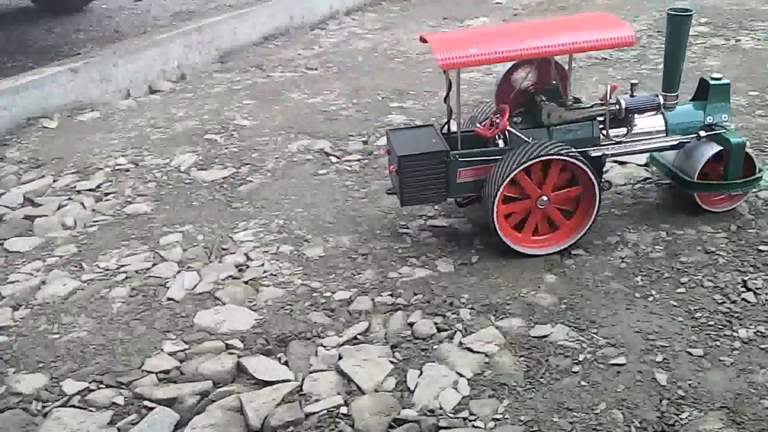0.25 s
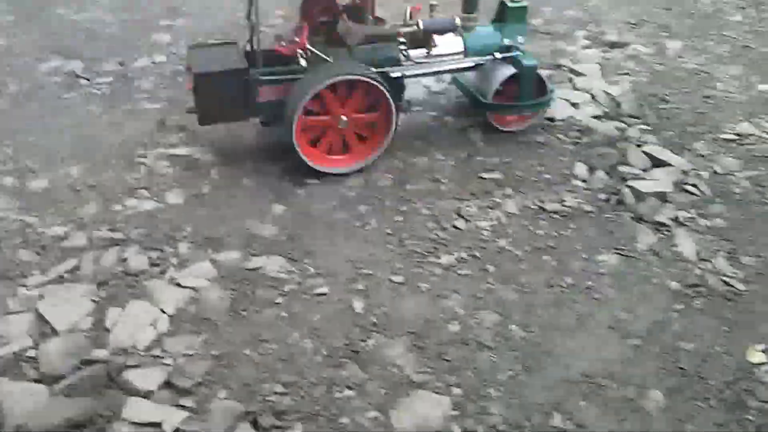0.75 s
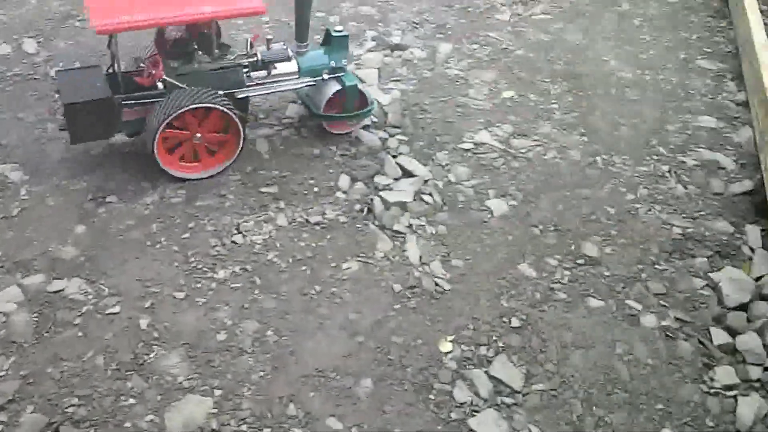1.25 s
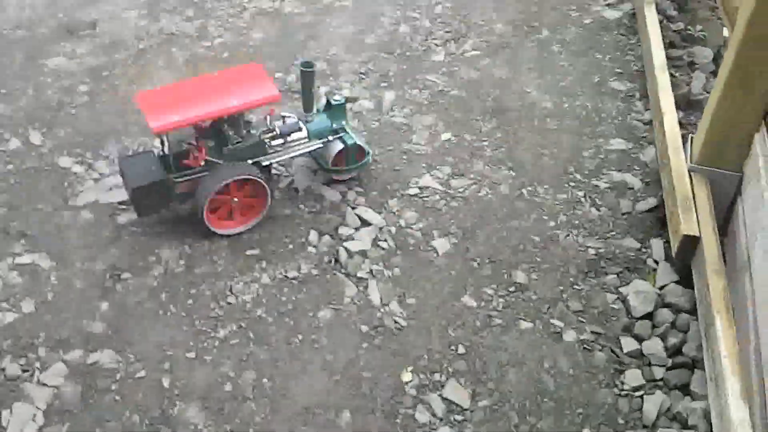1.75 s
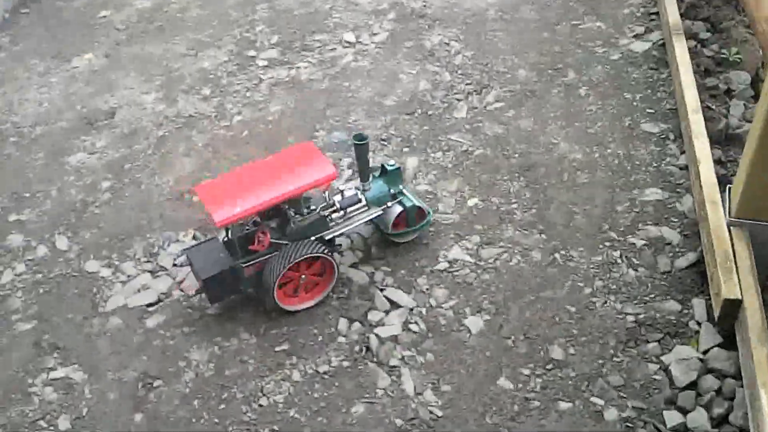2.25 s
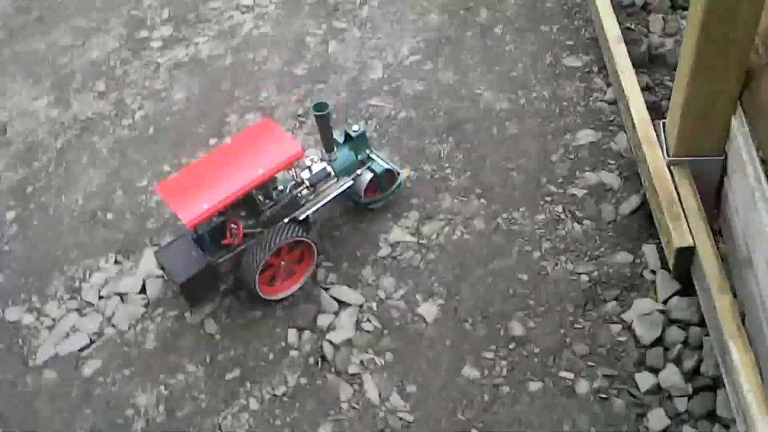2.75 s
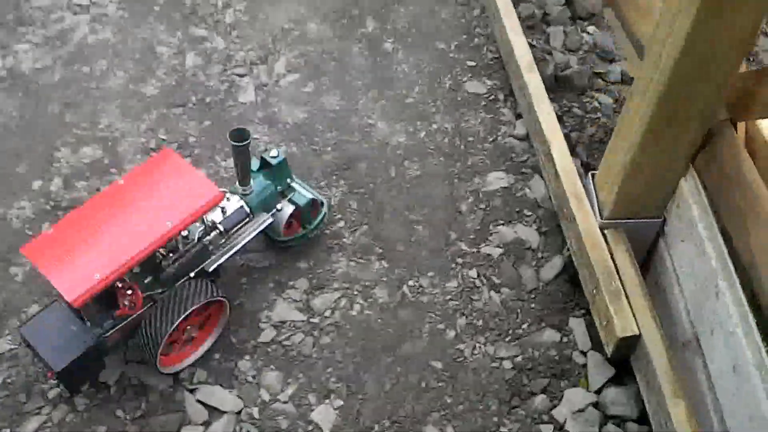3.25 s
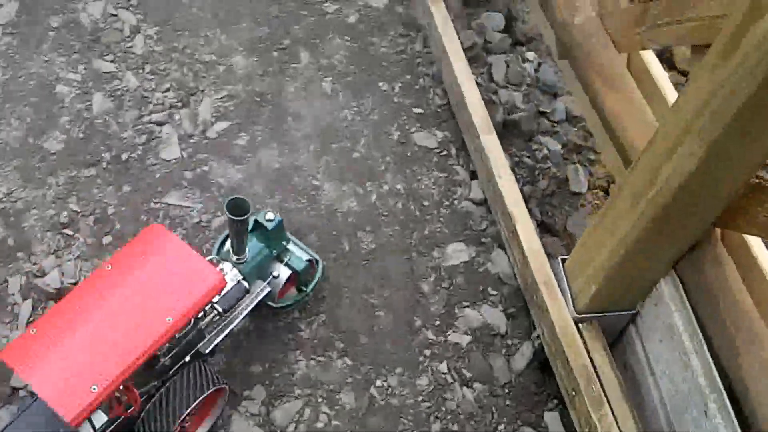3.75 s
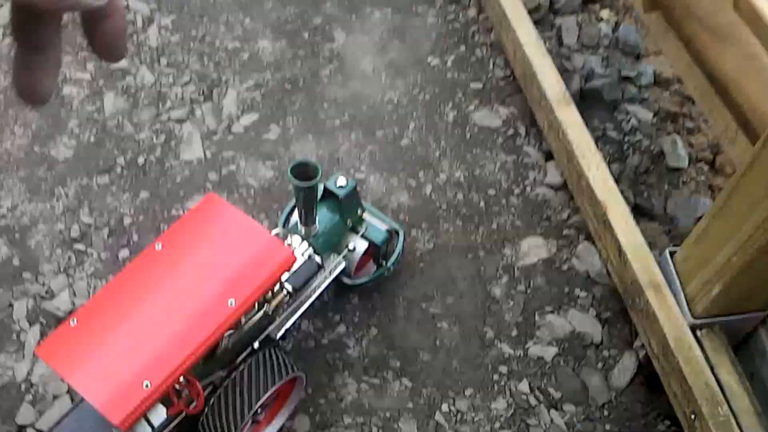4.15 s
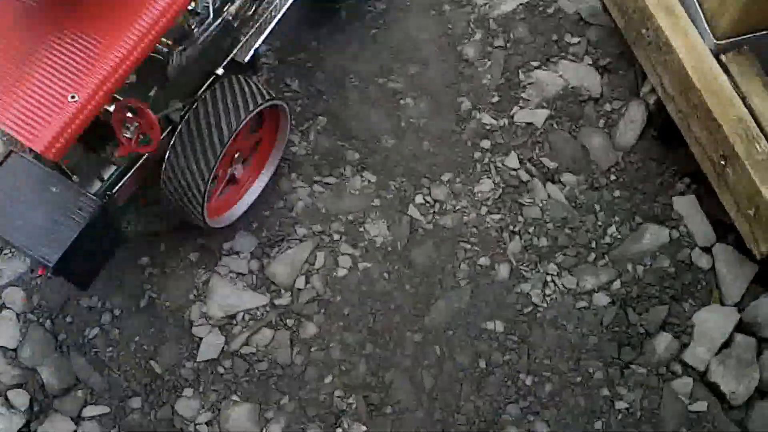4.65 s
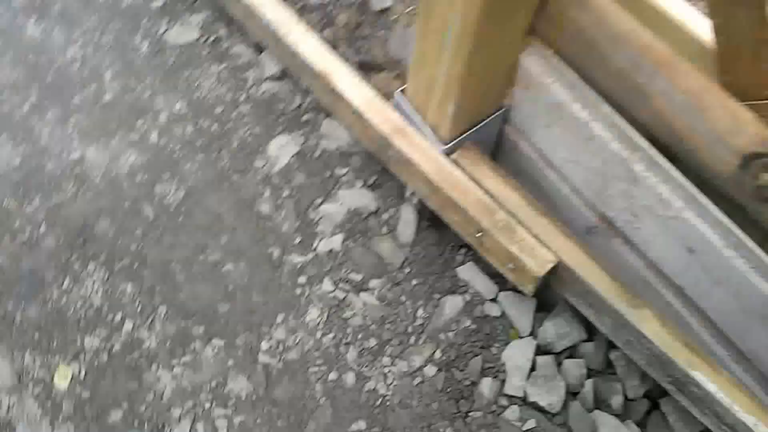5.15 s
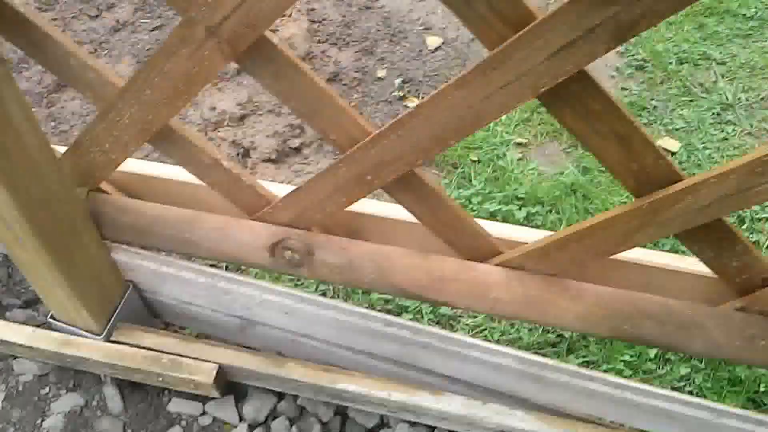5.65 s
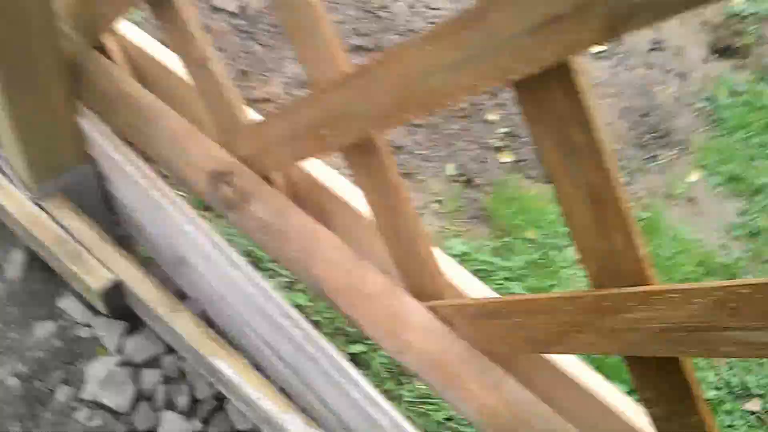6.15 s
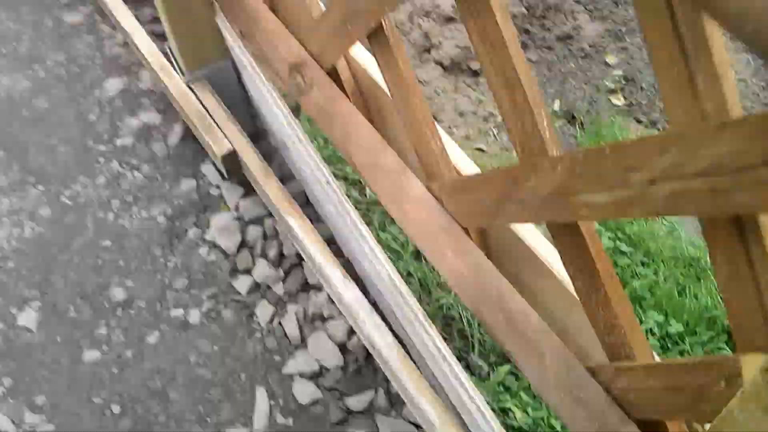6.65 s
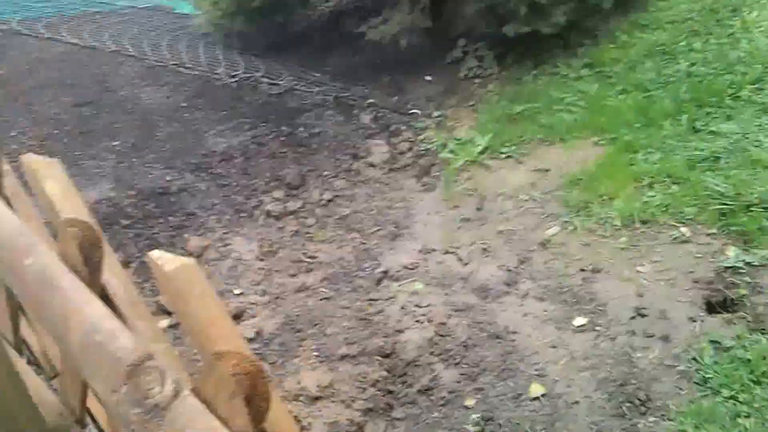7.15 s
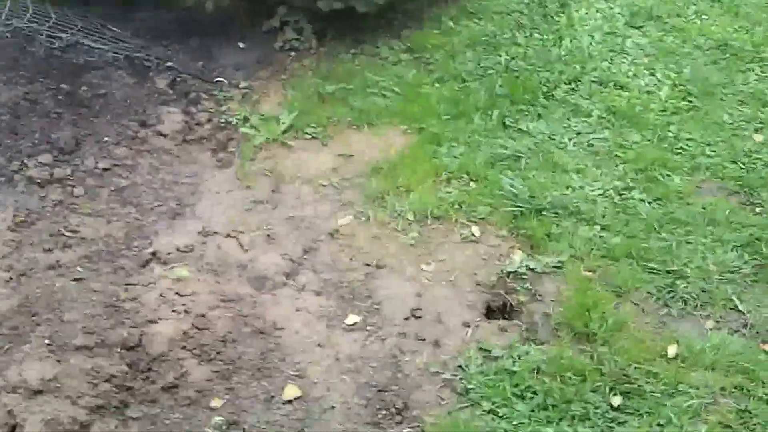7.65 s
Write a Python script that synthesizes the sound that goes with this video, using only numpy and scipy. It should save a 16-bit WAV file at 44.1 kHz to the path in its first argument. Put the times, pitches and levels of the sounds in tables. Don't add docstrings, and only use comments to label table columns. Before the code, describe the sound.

A small live-steam machine clatters quickly over gravel near a hand-held microphone in open air. Bright thin metal ticks and short exhaust chuffs merge into a fast purring rattle, with scattered stone clicks and crushing crunches. One sharp snap briefly pulls the level down; crunching thickens toward the middle, bumps shake the microphone, the ground noise eases, then the clatter swells with low humming and a thin steam whistle.

```python
import sys
import numpy as np
from scipy import signal
from scipy.fft import rfft, irfft
from scipy.io import wavfile
from scipy.ndimage import uniform_filter1d

SR = 44100
rng = np.random.default_rng(int(sys.argv[2]) if len(sys.argv) > 2 else 0)


def volts_from_db(level):
    exponent = np.asarray(level, float) / 20
    return 10 ** exponent


def int16_out(signal):
    q = np.round(np.clip(np.atleast_2d(signal).T, -1, 1) * 32767)
    wavfile.write(sys.argv[1], SR, q.astype(np.int16))


N = 347508

# f/Hz, width/Hz, level/dB
HOLLOWS = [(2500, 61, 6.5), (3703, 660, 11), (4630, 3100, -10), (4840, 68, 5), (5500, 620, -1.5),
           (6115, 130, 6.5)]
BITE_S = 0.011


def rms_one(x):
    return x / np.sqrt(np.mean(x ** 2) + 1e-20)


def in_time(rows):
    s, *columns = np.transpose(rows)
    return [np.interp(np.arange(N) / SR, s, c) for c in columns]


def drift(rate):
    r = np.exp(-80 * np.pi * rate / SR)
    noise = rng.standard_normal(N // 40 + 2002)
    slow = signal.lfilter([1], [1, -2 * r, r * r], noise)[2000:]
    return np.interp(np.arange(N) / 40, np.arange(len(slow)), rms_one(slow))


def band(x, low_hz, high_hz):
    return signal.sosfilt(signal.butter(2, [low_hz, high_hz], "band", fs=SR, output="sos"), x)


def coloured(x, points):
    hz, level_db = np.transpose(points)
    grid = np.fft.rfftfreq(N, 1 / SR) + 1
    gain = volts_from_db(np.interp(np.log(grid), np.log(hz), level_db))
    return rms_one(irfft(rfft(x) * gain, N))


def ring(clicks, hz, t60):
    r, w = volts_from_db(-60 / (t60 * SR)), 2 * np.pi * hz / SR
    return signal.lfilter([0, np.sin(w)], [1, -2 * r * np.cos(w), r * r], clicks + 1e-18)


def resonance(x, hz, width_hz):
    r = np.exp(-np.pi * width_hz / SR)
    zeros = np.array([1, 0, -1]) * (1 - r * r) / 2
    return signal.lfilter(zeros, [1, -2 * r * np.cos(2 * np.pi * hz / SR), r * r], x)


def hollow(x, modes, through_db, shifting_db):
    out = volts_from_db(through_db) * x
    for k, (hz, width_hz, db) in enumerate(modes):
        strength = volts_from_db(db + shifting_db * drift(4.5))
        out = out + strength * resonance(x, hz, width_hz) * (-1) ** k
    return out


def grains(per_s, spread_db):
    out, at = np.zeros(N), np.flatnonzero(rng.random(N) < per_s / SR)
    size_db = spread_db * np.minimum(rng.exponential(1, len(at)), 4)
    out[at] = volts_from_db(size_db) * rng.choice([-1, 1], len(at))
    return rms_one(out)


def impulses(times, level_db):
    out = np.zeros(N)
    out[(np.asarray(times) * SR).astype(int)] = volts_from_db(level_db)
    return out


def burst(clicks, rise_s, fall_s):
    a, b = np.exp(-1 / (rise_s * SR)), np.exp(-1 / (fall_s * SR))
    fall = signal.lfilter([1], [1, -b], clicks + 1e-18)
    return signal.lfilter([1 - a], [1, -a], fall)


def lasting(s, length):
    half = BITE_S / 2
    corners = [s - half, s + half, s + length - half, s + length + half]
    return np.interp(np.arange(N) / SR, corners, [0, 1, 1, 0])


def contacts(turns, chatter_db):
    # t/s, peak level/dB, puff level above the ring/dB
    knocks = [(0.121, -13.5, -18), (0.3488, -23, -12), (0.5034, -13.5, -24), (0.526, -17, 2),
              (0.584, -18.5, -14), (1.215, -17, -10), (1.63, -16, -1), (1.9874, -23, 8), (2.394, -24, -2),
              (2.6204, -22, -6), (2.7318, -15, -2), (3.105, -17, -4), (3.4077, -16, 3), (3.469, -20, 10),
              (3.838, -17.5, -13), (4.3906, -21, 9), (4.4725, -17, -11), (4.506, -17, 2), (4.559, -23, 8),
              (4.6526, -20.5, 0), (4.937, -17, 12), (5.248, -19, -6), (5.296, -19, -6), (5.2814, -9, -5.5),
              (5.974, -13.5, -14), (6.3036, -29, -11), (6.402, -15, -15), (6.489, -13, -27),
              (6.7317, -23, -10), (6.961, -14, -3), (7.578, -11.5, -26)]
    # t/s, peak level/dB, puff level above the ring/dB
    taps = [(0.2104, -25, 10), (.44, -22, -13), (.5551, -20, 0), (0.983, -16, -14), (1.8548, -20, -12),
            (2.161, -30, 17), (2.3306, -20, -2), (2.46, -24, 2), (2.553, -22, 1.5), (3.0652, -28, 1),
            (3.1298, -17, 2), (3.18, -34, 13), (3.239, -28, 15), (3.258, -16, -14), (3.3113, -14.5, 0),
            (3.721, -28, 12.5), (3.861, -20, -7), (4.1295, -22.5, -8), (4.253, -21, 9.5),
            (4.6369, -23, 6.5), (4.886, -30, 8), (5.304, -14, -13), (5.828, -26, -17), (6.001, -21, 0),
            (6.141, -29, -16), (6.63, -21, -12), (6.767, -38, 9), (7.119, -23, -20), (7.455, -23, -4),
            (7.6155, -12, -12)]
    # place in turn/0-1, slack/s, peak level above chatter/dB, puff level/dB
    turn_contacts = [
        (0.0, 0.0028, 8, -4),
        (0.549, 0.0124, 14.5, -24.5),
    ]
    uneven_db, puff_uneven_db = 4, -0.5
    rows = [np.array(knocks), np.array(taps)]
    for place, slack_s, peak_db, puff_db in turn_contacts:
        at = np.flatnonzero(np.diff(np.floor(turns - place)))
        luck = np.clip(rng.standard_normal((len(at), 3)), -2, 1.4)
        s = np.clip(at / SR + slack_s * luck[:, 0], 0, (N - 1) / SR)
        hit_db = chatter_db[at] + peak_db + uneven_db * luck[:, 1]
        rows.append(np.c_[s, hit_db, puff_db + puff_uneven_db * luck[:, 2]])
    return np.vstack(rows)


def struck(modes, times, level_db, chatter, scatter_db):
    luck, noise = rng.normal(0, 1, (len(times), len(modes))), rng.standard_normal(N)
    out = 0
    for k, (hz, mode_db, t60) in enumerate(modes):
        swell = burst(impulses(times, level_db + scatter_db * luck[:, k]), .0012, .004)
        hits = swell * np.roll(noise, 997 * k)
        rub = chatter * volts_from_db(5 * drift(11) - 2) * grains(900, 4)
        out = out + volts_from_db(mode_db) * ring(hits + rub, hz, t60)
    return out


def mechanism(ticks, chatter_db):
    # f/Hz, level/dB, t60/s
    metal_modes = [(4860, -14, .04), (5200, -15, .03), (5560, -16, .04), (6150, -15, .045),
                   (8330, -17, .07), (8640, -4, .035), (8730, -2, .035), (8810, -5, .03)]
    # f/Hz, level/dB, t60/s
    small_modes = [(11220, -15, .07), (11380, -10, .08), (11510, -9, .06), (12820, -2, .06),
                   (12900, -2, .06), (15080, -3, .035)]
    s, peak_db, _ = ticks.T
    chatter = volts_from_db(chatter_db + 4.2 * drift(6.7))
    metal = struck(metal_modes, s, peak_db - 27, volts_from_db(-29.5) * chatter, scatter_db=2.5)
    small = struck(small_modes, s, peak_db - 40.5, volts_from_db(-38) * chatter, scatter_db=-2.0)
    swell = burst(impulses(s, peak_db - 17.5), rise_s=.0005, fall_s=.0011)
    crack = band(rng.standard_normal(N), 4000, 16500) * (swell + volts_from_db(-18) * chatter)
    return metal + small + crack


def exhaust(ticks):
    s, peak_db, puff_db = ticks.T
    swell = burst(impulses(s, peak_db + puff_db - 13.5), rise_s=.0006, fall_s=.003)
    jet = hollow(band(grains(5000, 3.0), 1000, 7000), HOLLOWS, through_db=-6, shifting_db=2.5)
    return rms_one(jet) * swell


def teeth(turns, tooth_db):
    at = np.flatnonzero(np.diff(np.floor(3 * turns)))
    luck = rng.standard_normal((len(at), 2))
    level_db = np.array([0, -3., -2.])[np.arange(len(at)) % 3] + 3 * luck[:, 0]
    s = np.clip(at / SR + .0028 * luck[:, 1], 0, (N - 1) / SR)
    clicks = burst(impulses(s, level_db), .0003, .002) * rng.standard_normal(N)
    case = resonance(clicks, 3830, 500) + volts_from_db(-6) * resonance(clicks, 2450, 400)
    case = case + volts_from_db(-12) * band(clicks, 1000, 7000)
    return volts_from_db(tooth_db) * rms_one(case)


def thumps(turns, tooth_db):
    # f/Hz, width/Hz, level/dB
    case_modes = [
        (610, 290, 0),
        (1320, 210, -7.5),
    ]
    # f/Hz, level/dB
    shaft_hum = [(334, -57), (377, -55.5), (522, -55.5), (560, -56), (608, -60), (689, -58.5), (770, -57)]
    hum_from_s, hum_rise_s, hum_wander_hz = 6.21, 0.66, 0.51
    fade = np.exp(-(turns % 1) / 0.13)
    swell = volts_from_db(3.0 * drift(8.7)) * uniform_filter1d(fade, size=130)
    noise = rng.standard_normal(N)
    case = rms_one(sum(volts_from_db(db) * resonance(swell * noise, hz, w) for hz, w, db in case_modes))
    hum = np.zeros(N)
    for hz, db in shaft_hum:
        phase = 2 * np.pi * np.cumsum(hz + hum_wander_hz * drift(1.52)) / SR
        hum += volts_from_db(db) * np.sqrt(2) * np.sin(phase)
    fade_in = np.clip((np.arange(N) / SR - hum_from_s) / hum_rise_s, 0, 1)
    return volts_from_db(tooth_db - 5) * case + hum * fade_in


def ground(rolling_db):
    # t/s, length/s, crunch level/dB, drum level above crunch/dB
    stones = [(0, 0.021, -30.5, -5.5), (0.02, 0.057, -39, -6), (0.113, 0.051, -40.5, -26),
              (0.194, 0.18, -35.5, -5), (0.386, 0.22, -36, -6.5), (0.751, 0.12, -34.5, -6),
              (0.95, 0.061, -34, -3), (1.114, 0.18, -34, -6.5), (1.367, 0.33, -36, -5),
              (1.698, 0.09, -32.5, -5.5), (1.987, 0.088, -34, -4), (2.167, 0.079, -32.5, -5.5),
              (2.266, 0.23, -33, -6.5), (2.556, 0.086, -34, -5.5), (2.717, 0.15, -36.5, -5.5),
              (3.073, 0.084, -38, -1), (3.253, 0.084, -31.5, -5), (3.399, 0.077, -29, -5),
              (3.484, 0.093, -34.5, -7), (3.719, 0.14, -35, -0.5), (4.04, 0.11, -30.5, -2),
              (4.234, 0.24, -34, -5.5), (4.387, 0.12, -27.5, -3), (4.633, 0.094, -32, -4),
              (4.873, 0.11, -31, -3), (5.1, 0.07, -43, 3), (5.141, 0.16, -38.5, 3.5),
              (6.313, 0.03, -32.5, -4), (6.609, 0.022, -30.5, -6), (6.773, 0.13, -37, -4.5),
              (7.131, 0.23, -34, -6.5), (7.561, 0.013, -32.5, -4.5)]
    drum_on_grit_db = -6.5
    sag_db_per_s = 9
    crunch, drum = volts_from_db(2 * rolling_db), volts_from_db(2 * (rolling_db + drum_on_grit_db))
    for s, length, crunch_db, drum_db in stones:
        first, last = int((s - BITE_S) * SR), int((s + length + 2 * BITE_S) * SR)
        at = np.arange(max(first, 0), min(last, N))
        sag = volts_from_db(sag_db_per_s * length)
        corners = [s - BITE_S / 2, s + BITE_S / 2, s + length - BITE_S / 2, s + length + BITE_S]
        under = np.interp(at / SR, corners, [0, sag, 1 / sag, 0])
        crunch[at] += under * volts_from_db(2 * crunch_db)
        drum[at] += under * volts_from_db(2 * (crunch_db + drum_db))
    return 10 * np.log10(crunch), 10 * np.log10(drum)


def rollers(turns, rolling_db, shake_db, note_db):
    # f/Hz, level per Hz/dB
    grit_spectrum = [(410, -59), (700, -1.5), (3030, -1), (3600, -5.5), (7890, 3), (8760, 7.5),
                     (10300, -11), (13100, -8), (15400, -7), (16000, -33)]
    # f/Hz, width/Hz, level/dB
    drum_modes = [(875, 2400, -19), (1402, 93, 0), (1620, 63, -5), (1804, 76, 4), (2015, 145, -8),
                  (2370, 153, 1)]
    # f/Hz, width/Hz, level/dB
    chassis_modes = [(254, 720, -10), (421, 30, 9), (656, 530, -12), (721, 33, 4)]
    # t/s, length/s, rumble level/dB
    drags = [(4.05, 0.13, -38), (4.193, 0.16, -39.5), (4.387, 0.13, -36), (5.11, .18, -34.5),
             (7.133, 0.248, -42.5), (7.548, 0.027, -45)]
    shake_follows, sing_follows = 0.86, 2.28
    crunch_db, drum_db = ground(rolling_db)
    singing_db = note_db + sing_follows * (drum_db + 44.5)
    shake_power = volts_from_db(2 * shake_db) + volts_from_db(2 * (-48.5 + shake_follows * (drum_db + 38.5)))
    drag_power = sum(lasting(s, length) * volts_from_db(2 * db) for s, length, db in drags)
    rumble_db = 10 * np.log10(shake_power + drag_power)

    load = np.where(np.arange(N) < 5.3 * SR, 1, .9)
    throb = np.cos(2 * np.pi * (turns - .1) + .45 * drift(1.3))
    throb_db = 1.9 * load * throb + 2.0 * drift(62)

    stones = coloured(grains(3500 * volts_from_db(2.5 * drift(25)), 2.8), grit_spectrum)
    drum = hollow(band(stones, 750, 2700), drum_modes, through_db=-7, shifting_db=2)
    crunch = hollow(band(stones, 2700, 13000), HOLLOWS, through_db=-8, shifting_db=2)
    singing = resonance(resonance(stones, 1748, 194), 1757, 230)
    low_noise = band(band(rng.standard_normal(N), 190, 1000), 150, 1300)
    rumble = hollow(low_noise, chassis_modes, through_db=-5, shifting_db=1.5)
    grit = volts_from_db(drum_db - 3.0) * rms_one(drum) + volts_from_db(crunch_db - 4.5) * rms_one(crunch)
    grit = grit + volts_from_db(singing_db - 16) * rms_one(singing)
    return volts_from_db(throb_db) * grit + volts_from_db(rumble_db - 4.5 + 0.38 * throb_db) * rms_one(rumble)


def canopy():
    # t/s, length/s, level/dB
    spells = [(0, 0.16, -40), (0.196, 0.19, -41.5), (0.412, 0.21, -38.5), (0.875, 0.42, -46),
              (1.394, 0.76, -45), (2.495, 0.33, -41.5), (2.913, 0.243, -51), (4.19, 0.14, -43.5),
              (5.35, 0.34, -54.5)]
    # f/Hz, level/dB, t60/s
    sheet_modes = [(900, -10, 0.049), (2295, -5, 0.022), (3280, -10, 0.057), (4870, 0, 0.02),
                   (5460, -5.5, 0.016), (6130, -3.5, 0.022)]
    clicks = grains(per_s=400, spread_db=2.5)
    sheet = np.zeros(N)
    for hz, db, t60 in sheet_modes:
        sheet += volts_from_db(db) * rms_one(ring(clicks * volts_from_db(3.5 * drift(12)), hz, t60))
    swell = uniform_filter1d(sum(volts_from_db(db) * lasting(s, length) for s, length, db in spells), size=900)
    return rms_one(sheet) * swell


def outdoor_air(shake_db):
    # f/Hz, level per Hz/dB
    air_spectrum = [(12, -52), (20, 0), (27, -16), (65, 3), (221, -2.5), (300, -39), (390, -2.5),
                    (660, -120)]
    level_db = -55 + 0.66 * (shake_db + 47.5)
    return volts_from_db(level_db + 2 * drift(2.7)) * coloured(rng.standard_normal(N), air_spectrum)


def gravel_ticks():
    # t/s, peak level/dB, f/Hz
    tick_rows = [(0.1216, -21.5, 4840), (0.1411, -24, 4830), (0.1915, -27, 4270), (0.2154, -21.5, 6070),
                 (0.2369, -22, 4410), (0.2588, -25, 4920), (0.3551, -23, 4970), (0.41, -27, 4060),
                 (0.4429, -23, 4870), (0.4653, -22, 5050), (0.5033, -22, 4920), (0.5267, -21, 6060),
                 (0.5851, -21, 5330), (0.6433, -30.5, 4870), (0.7501, -39, 3320), (0.7576, -25.5, 5270),
                 (0.7885, -33, 4960), (0.8104, -30, 6320), (0.8608, -38, 6230), (0.9292, -37, 5240),
                 (0.984, -33, 3540), (1.1013, -34, 4160), (1.1402, -32, 4330), (1.2115, -28, 5630),
                 (1.2544, -30, 5350), (1.3278, -36, 4810), (1.3552, -36, 3840), (1.3811, -30, 5390),
                 (1.423, -34, 3520), (1.44, -34, 3620), (1.4869, -30, 5360), (1.5572, -24, 5340),
                 (1.5971, -29, 3620), (1.6316, -25, 4930), (1.657, -30, 3570), (1.6695, -26, 5500),
                 (1.7209, -29, 3560), (1.8945, -35, 3580), (1.9344, -33, 3870), (1.9478, -28, 5050),
                 (1.9878, -26, 3580), (2.0411, -24.5, 3520), (2.114, -26, 4990), (2.1604, -29, 3660),
                 (2.1773, -25, 4160), (2.2093, -27, 5050), (2.2287, -20, 5230),
                 (2.3223, -25, 3680), (2.3412, -22, 3610), (2.3831, -23, 4990), (2.3941, -25, 3540),
                     (2.453, -31, 3500), (2.5078, -22.5, 6120), (2.5522, -25, 3600), (2.5647, -21, 6120),
                     (2.667, -22.5, 4900), (2.7134, -23, 3770), (2.7322, -18.5, 6060), (2.7603, -23, 6180),
                     (2.8316, -21.5, 3830), (2.8795, -40, 3700), (2.9024, -35, 4830), (2.9404, -31, 3670),
                     (2.9618, -31, 6100), (3.0117, -30, 4860), (3.0526, -34, 3800), (3.0661, -26, 3540),
                     (3.1055, -21, 3640), (3.1239, -18, 5540), (3.1823, -24, 4810), (3.2175, -27, 3870),
                     (3.238, -17.5, 4870), (3.2941, -22, 3500), (3.3483, -23, 3450), (3.3769, -19, 3650),
                     (3.4003, -18, 5230), (3.4193, -16, 3800), (3.439, -19, 3470), (3.4697, -19.5, 4280),
                     (3.5036, -24, 3610), (3.5156, -21, 5340), (3.6088, -26, 3510), (3.6258, -30, 5540),
                     (3.6672, -28, 4900), (3.7036, -26, 4900), (3.7228, -22, 3520), (3.767, -29, 5360),
                     (3.7874, -25, 5250), (3.8398, -28, 5080), (3.8493, -25, 5160), (3.9446, -33, 2870),
                     (3.995, -34, 3890), (4.042, -36, 2500), (4.0414, -30, 3520), (4.0638, -21, 3570),
                     (4.1805, -25, 4870), (4.216, -27, 4890), (4.2367, -20.5, 2850), (4.2698, -22, 5030),
                     (4.2873, -21, 4900), (4.3407, -23, 3820), (4.3606, -24, 4910), (4.3933, -16, 3590),
                     (4.5053, -19.5, 5310), (4.559, -21, 3840), (4.5926, -23, 3590), (4.6126, -30, 3150),
                 (4.6437, -20, 3380), (4.7221, -24, 3470), (4.7759, -25, 3500), (4.8064, -25, 3620),
                    (4.8637, -27, 4030), (4.9161, -20, 3810), (4.941, -19, 4550), (5.0089, -28, 4830),
                    (5.1785, -31, 3850), (5.2189, -21.5, 3570), (5.2818, -21, 4870), (5.3935, -29, 3830),
                    (5.5272, -25.5, 3840), (5.6425, -35, 3820), (5.6814, -33, 3740), (5.7657, -41, 3700),
                    (5.7833, -28, 3880), (5.8615, -27, 3980), (5.9118, -27, 3840), (5.9777, -28, 4820),
                    (6.0066, -28, 4820), (6.0455, -29, 3700), (6.1733, -28, 2580), (6.1852, -26, 4160),
                    (6.2226, -29, 3820), (6.2526, -28, 3600), (6.3094, -25, 4840), (6.3269, -22, 3660),
                    (6.3853, -25, 4380), (6.4218, -23, 5640), (6.49, -32, 4800), (6.5473, -31, 4830),
                    (6.6068, -22, 6170), (6.6522, -23, 3710), (6.6956, -28, 3610), (6.7335, -19.5, 5990),
                    (6.7674, -29, 3490), (6.7899, -31, 2710), (6.8028, -27, 3800), (6.844, -19.5, 4760),
                    (6.8742, -18, 3790), (6.8991, -17, 4000), (6.9919, -22, 6320), (7.0373, -25, 2690),
                    (7.086, -26, 3890), (7.1296, -25, 3710), (7.1835, -26, 4310), (7.24, -18.5, 6190),
                    (7.285, -21, 3430), (7.3132, -21, 4250), (7.3564, -24, 5800), (7.4235, -26, 5700),
                    (7.4768, -19.5, 3500), (7.5242, -20, 3530), (7.5566, -21, 3700), (7.7088, -32, 4890),
                    (7.7611, -31, 4290), (7.8085, -26, 3420)]
    rattle_s, crack_s, width_hz = 0.0041, 0.0044, 183
    rows, t = tick_rows, np.arange(1500) / SR
    out, noise = np.zeros(N + SR), rng.standard_normal((len(rows), 1500))
    cracks = band(noise[:, ::-1] * np.exp(-t / crack_s), 1300, 12200)
    for (s, db, hz), n, crack in zip(rows, noise, cracks):
        ping = resonance(n * np.exp(-t / rattle_s), hz, width_hz)
        tick = ping / np.abs(ping).max() + volts_from_db(-1.5) * crack / np.abs(crack).max()
        out[int(s * SR):][:len(t)] += volts_from_db(db - 5) * tick
    return out[:N] / gain_control()


def snaps():
    # t/s, peak height, contact corner f/Hz, body f/Hz, body level/dB
    snap_events = [
        (.6155, .92, 5000, 1900, -10),
        (.6249, .05, 4000, 1700, -6),
        (2.2657, .19, 8000, 3400, 3),
        (2.2672, .23, 4000, 2200, 2),
        (2.2682, .1, 4000, 1100, -4),
        (5.2671, .26, 2200, 620, -2),
        (5.6922, .14, 2500, 1050, -1),
    ]
    # f/Hz, level/dB, t60/s
    snap_body = [(272, -12, 0.04), (2940, -14.5, 0.0076), (4550, -16, 0.0063)]
    out, click = np.zeros(N + SR), np.arange(SR // 4) == 0
    for s, height, corner_hz, body_hz, body_db in snap_events:
        push = band(click + 1e-18, 200, corner_hz)
        body = [*snap_body, (body_hz, body_db, 16 / body_hz)]
        shape = -sum(volts_from_db(db) * 6 * hz / SR * ring(push, hz, t60) for hz, db, t60 in body) - push
        out[int(s * SR):][:len(shape)] += height * shape / np.abs(shape).max()
    return out[:N]


def bumps():
    # t/s, peak level/dB, f/Hz
    thuds = [(4.069, -21.5, 408), (4.157, -27, 155), (4.435, -15.5, 220), (5.149, -30, 487),
             (5.178, -15.5, 463), (6.019, -37, 59.2), (6.181, -27, 147), (6.197, -23.5, 110),
             (6.699, -35.5, 70.5), (7.239, -21.5, 283), (7.261, -19, 340)]
    out, t = np.zeros(N + SR), np.arange(SR // 4) / SR
    for s, db, hz in thuds:
        swell = (1 - np.exp(-t / 0.00053)) * np.exp(-t * hz / 1.34)
        out[int(s * SR):][:len(t)] += volts_from_db(db - 2) * swell * np.sin(2 * np.pi * hz * t)
    return out[:N]


def leak():
    # t/s, f/Hz, level/dB
    whistle = [(6.15, 8950, -70.5), (6.33, 9000, -43.5), (6.56, 9080, -47), (6.72, 9060, -58),
               (6.95, 9080, -45), (7.15, 9070, -40), (7.35, 9040, -46.5), (7.52, 9000, -41.5),
               (7.62, 8950, -55)]
    width_hz = 87
    hz, level_db = in_time(whistle)
    at = np.arange(N)
    silent = (at < whistle[0][0] * SR) | (at > whistle[-1][0] * SR)
    level_db = np.where(silent, -99, level_db)
    r, phase = np.exp(-2 * np.pi * width_hz / SR), 2 * np.pi * np.cumsum(hz) / SR
    a, b = signal.lfilter([1], [1, -2 * r, r * r], rng.standard_normal((2, N)))
    return volts_from_db(level_db + 2.3 * drift(9)) * rms_one(a * np.cos(phase) + b * np.sin(phase))


def gain_control():
    # t/s, cut level/dB
    ducks = [
        (0.624, -10.5),
        (5.302, -4),
        (7.593, -7.5),
    ]
    duck_s, recover_db_per_s = 0.016, 5
    t, gain_db = np.arange(N) / SR, np.zeros(N)
    for s, cut_db in ducks:
        recovering_db = np.minimum(cut_db + recover_db_per_s * (t - s), 0)
        gain_db += np.clip((t - s) / duck_s, 0, 1) * recovering_db
    return volts_from_db(gain_db)


def scene():
    # t/s, then level/dB of fine grit, chatter, chassis shake, tooth clicks, drum note
    running = [(0, -47, -41.5, -52.5, -62, -50), (.6, -45, -42.5, -51, -66, -40),
               (1.3, -46, -39.5, -47, -66, -55), (2.5, -42, -42, -50.5, -75, -40),
               (3.3, -41, -47, -46.5, -45.5, -47), (4.1, -38, -45.5, -48, -73, -56),
               (4.9, -36.5, -46.5, -48, -44, -44), (5.15, -43.5, -50, -45, -57, -62),
               (5.45, -43.5, -47, -48.5, -48, -47), (6.2, -41.5, -40.5, -43, -44, -46),
               (6.8, -34, -36.5, -44, -45, -34), (7.3, -39, -40, -43, -41.5, -41.5),
               (7.88, -33, -33, -39, -43, -38)]
    # t/s, turns completed
    crank = [(-.053, -1), (.5863, 10), (1.7787, 31), (2.5623, 45), (3.3475, 59), (4.504, 80), (4.93, 88),
             (5.693, 103), (6.003, 109), (6.453, 118), (7.0406, 130), (7.514, 140), (7.93, 149)]
    rolling_db, chatter_db, shake_db, tooth_db, note_db = in_time(running)
    turns, = in_time(crank)
    ticks = contacts(turns, chatter_db)
    engine = mechanism(ticks, chatter_db) + exhaust(ticks) + teeth(turns, tooth_db) + thumps(turns, tooth_db)
    loose = canopy() + gravel_ticks() + leak()
    rolling = rollers(turns, rolling_db, shake_db, note_db)
    return (engine + loose + rolling + outdoor_air(shake_db) + snaps() + bumps())[None]


def roll_off(x):
    return signal.sosfilt(signal.butter(12, 16300, fs=SR, output="sos"), x)


def record(dry):
    bass_cut = signal.butter(1, 50, "high", fs=SR, output="sos")
    top_cut = signal.cheby2(12, 60, 16000, fs=SR, output="sos")
    mix = signal.sosfilt(bass_cut, dry * gain_control())
    mix = signal.sosfilt(top_cut, mix)
    return roll_off(mix)


dry = scene()
out = record(dry)
int16_out(out)
```